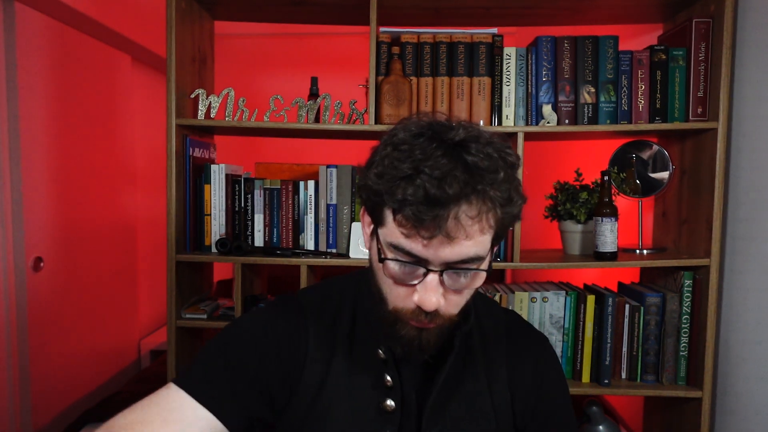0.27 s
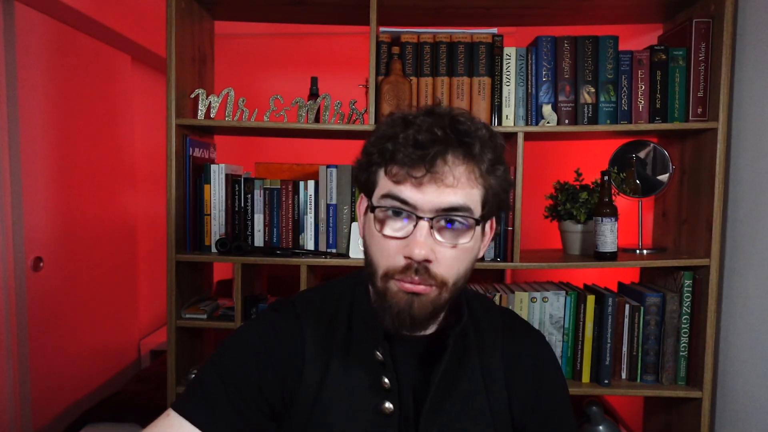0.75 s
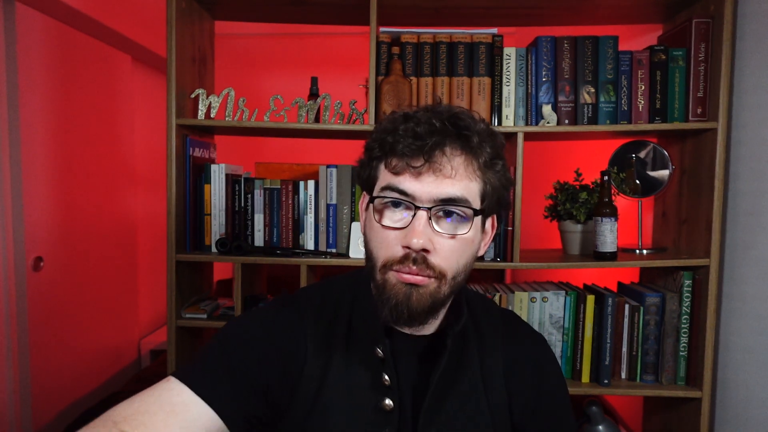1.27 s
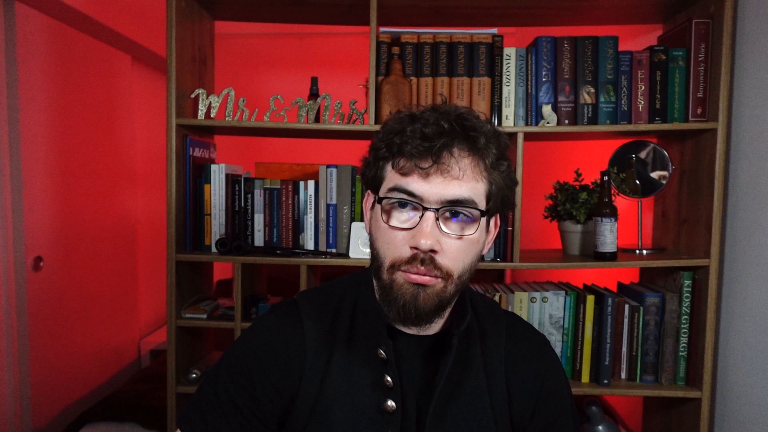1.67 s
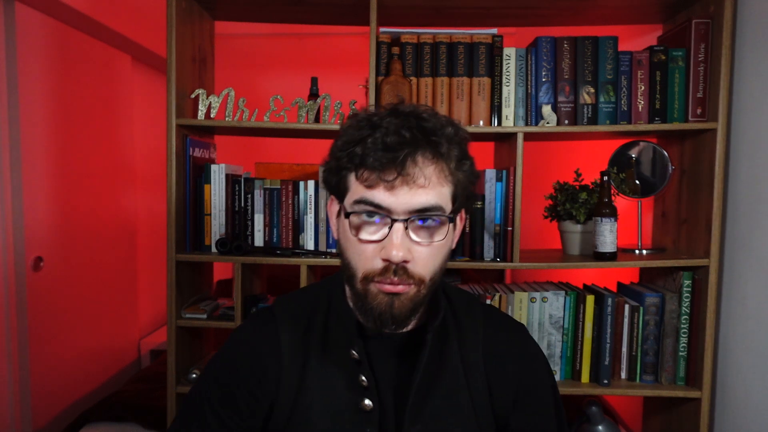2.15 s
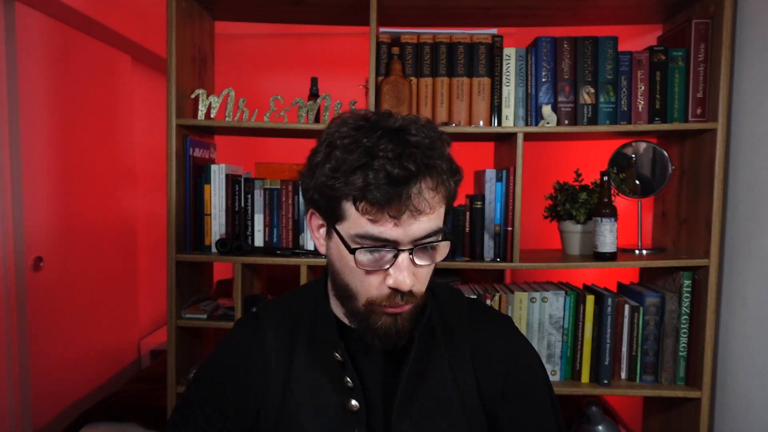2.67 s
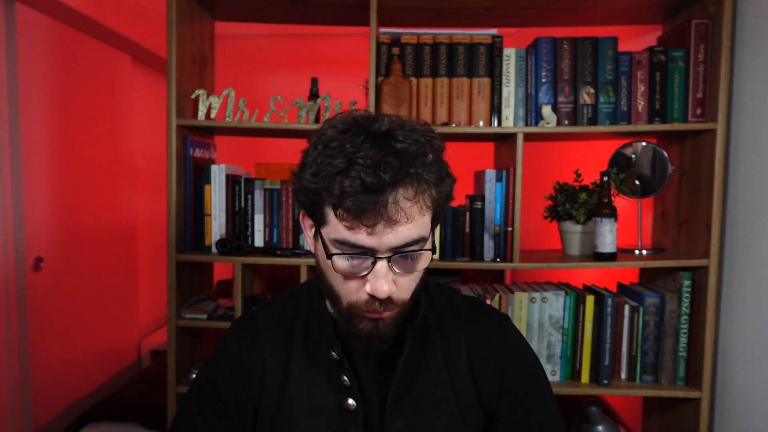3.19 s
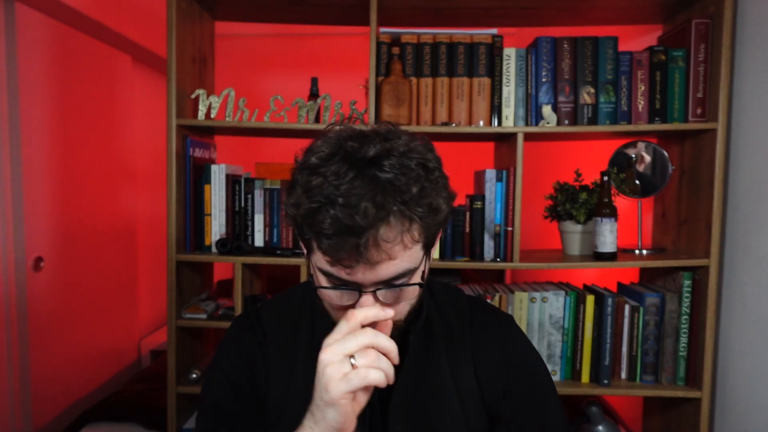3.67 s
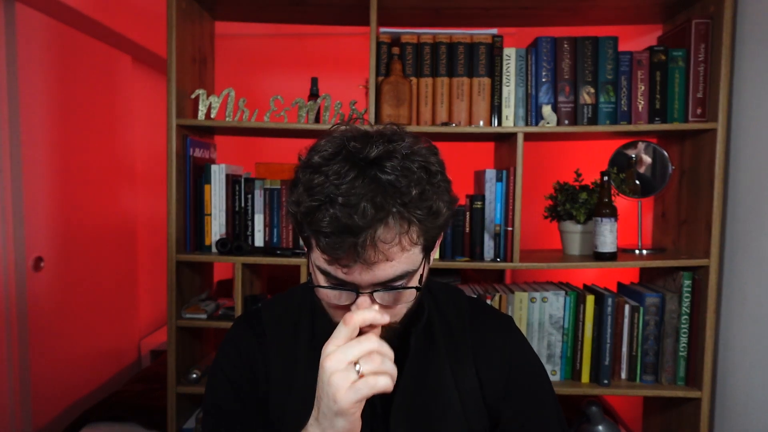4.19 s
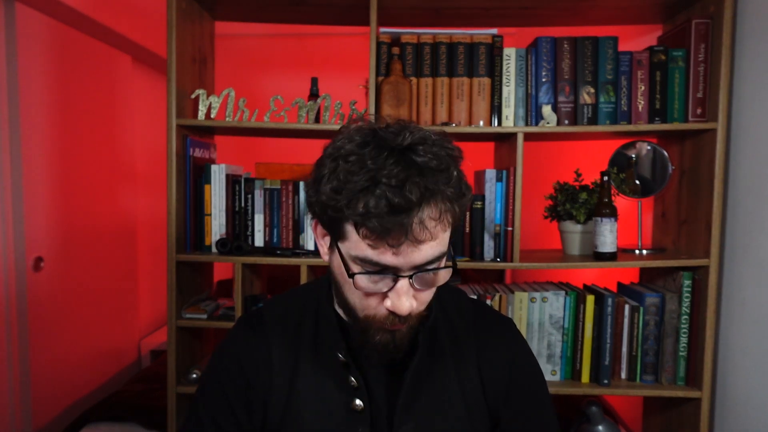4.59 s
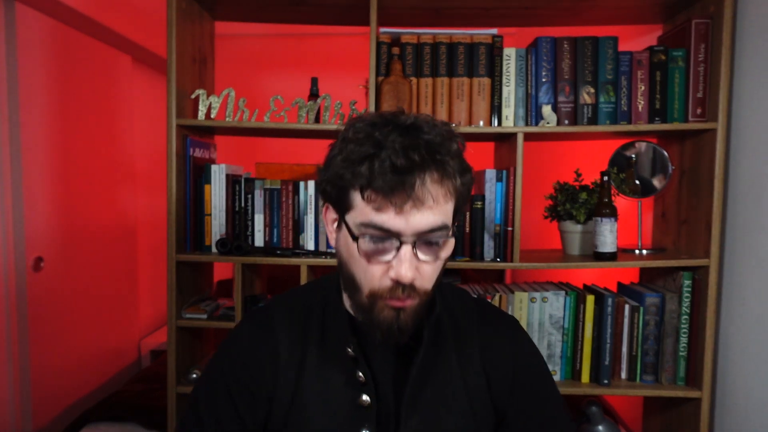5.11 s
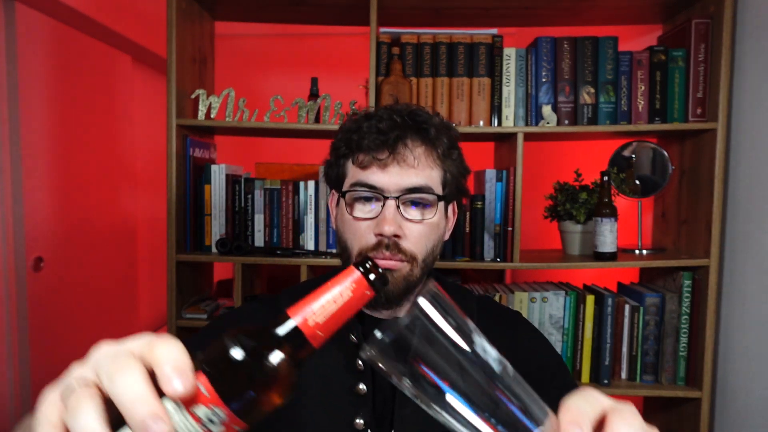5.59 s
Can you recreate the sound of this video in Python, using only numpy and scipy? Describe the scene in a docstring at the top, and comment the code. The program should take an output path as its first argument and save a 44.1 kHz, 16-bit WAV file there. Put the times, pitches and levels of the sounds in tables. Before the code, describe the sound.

Close stereo microphone in a small, fairly dry room. Hard objects scrape and knock on a wooden table, thinning out, then a steel opener ticks against a bottle. The cap cracks off with clattering snaps and a short sputtering hiss. A glass then rubs over the wood in three pushes, and tiny drops fall at the very end.

```python
"""Opening a beer bottle at a table

A small room with a wooden table, a stereo microphone close by. Noise drags and cracks, with ringing wood,
give the things shifted and knocked on it; a steel opener ticks and rings on the cap, which gives way in a
clatter of snaps, with ringing cap and bottle and gas made of fluttering noise. Rubbing noise and resonances
slide a glass over the wood in three pushes; three short rising tones are the first drops falling into it."""
import sys
import numpy as np
from scipy import signal
from scipy.fft import rfft, irfft, next_fast_len
from scipy.io import wavfile
from scipy.ndimage import map_coordinates

SR = 44100
rng = np.random.default_rng(int(sys.argv[2]) if len(sys.argv) > 2 else 0)


def pcm_store(signal):
    """Save signal as 16-bit PCM."""
    levels = np.round(np.clip(np.atleast_2d(signal), -1, 1) * 32767)
    wavfile.write(sys.argv[1], SR, levels.astype(np.int16).T)


N = 257984  # length in samples

# Quiet air at the microphone. Each row: frequency in Hz, relative level in dB per Hz.
AIR_COLOUR = [(15, -66.5), (25, -35), (86, -4), (140, 1.5), (260, 1), (331, -5), (582, -8), (848, -11.5),
              (1380, -12.5), (1710, -14.5), (5280, -19.5), (7910, -21.5), (8810, -21), (15500, -22)]
AIR_DB = -64
# Thin electronic whine. Each row: frequency in Hz, rms level in dB.
WHINE_TONES = [(6040, -92.5), (8107, -80.5), (10137, -85.5), (12086, -93)]
# Decay of the small room. Each row: frequency in Hz, t60 in seconds.
ROOM_DECAY = [(100, 0.26), (260, 0.33), (700, 0.33), (1840, 0.32), (4850, 0.32), (12800, 0.17)]
# Echoes from table top, shelves and nearest walls. Each row: delay in seconds, left and right in dB re direct.
NEAR_ECHOES = [(.0031, -15, -15), (.0079, -12, -14), (.0118, -14, -12), (.0183, -13, -14),
               (.0237, -15, -14)]
ONSET_DB = 31  # every swell rises from this far below its peak

# Something hard dragged over the table. Each row: start, rise and hold in seconds, gain in dB.
DRAG_SWELLS = [(-.01, 0.0077, 0.044, -23.5), (.32, 0.018, 0.0994, -53.5)]
DRAG_SAG_DB_PER_S, DRAG_RELEASE_DB_PER_S = 67, 240.5
# Ring of the dragged foot. Each row: frequency in Hz, width in Hz, relative level in dB.
DRAG_PEAKS = [(1180, 82, -19.5), (2815, 93, 0.5), (3220, 150, -2), (4750, 290, -2.5), (7590, 1100, -6),
              (12600, 950, -7.5)]
# Dull shuffling on the table. Each row: start, rise and hold in seconds, gain in dB.
SHUFFLE_SWELLS = [(-.01, 0.0066, .12, -28.5), (.33, 0.075, 0.047, -42.5), (.69, 0.075, .25, -53.5),
                  (1.73, .07, .12, -57), (4.66, 0.1, 0.053, -47.5)]
SHUFFLE_SAG_DB_PER_S, SHUFFLE_RELEASE_DB_PER_S = 48.5, 55.5

# Knocks on the table. Each row: start in seconds, thump, wood ring and hard click (before trims) in dB.
KNOCK_EVENTS = [(.003, -21, -23.5, -25.5), (.029, -29, -25, -26), (0.083, -22, -23.5, -28),
                (.191, -25.5, -31.5, -67), (.333, -33, -34, -39.5), (.429, -31.5, -30, -41.5),
                (0.4458, -20.5, -26, -15.5), (.555, -46, -55, -31.5), (0.5843, -28.5, -49, -26.5),
                (0.617, -44, -33, -62), (.789, -62, -50, -80), (.91, -54, -48.5, -80),
                (1.193, -29, -23.5, -45.5), (1.1976, -38, -30, -28.5), (1.2081, -35, -21, -22.5),
                (1.368, -32, -28.5, -65), (1.801, -70.5, -50, -94.5), (4.8, -48.5, -38, -72),
                (4.872, -46.5, -46, -80.5)]
# Soft thump of a knock, also the shuffling. Each row: frequency in Hz, relative level in dB per Hz.
THUMP_COLOUR = [(40, -30.5), (70, -7), (120, -3), (250, 2.5), (500, -7), (800, -15.5), (1400, -26.5),
                (2500, -22), (6000, -42.5)]
# Hard click of a knock, also the bright drag. Each row: frequency in Hz, relative level in dB per Hz.
CLICK_COLOUR = [(300, -24), (900, -3), (1200, 2), (1700, -8), (2400, -2.5), (3100, 1.5), (3650, -4),
                (4400, -1), (5300, -3), (6600, -8.5), (7700, -3.5), (9800, -5), (12000, -4.5), (15500, -9)]
# Modes of the table top. Each row: frequency in Hz, relative level in dB, t60 in seconds.
WOOD_MODES = [(82.8, -21.5, 0.66), (115.2, -6, 0.8), (117.5, -2.5, 0.42), (175.8, -0.5, 0.38),
              (186.2, -5.5, .35), (203.6, -6.5, 1), (206.9, -0.5, 0.54), (239, -11.5, 0.41),
              (285, 1.5, 0.41), (315, -15.5, 0.2), (384, -15, 0.091), (451, -8, 0.51), (479, -16, 0.17),
              (720, -15.5, 0.45), (826, -20.5, 0.5), (986, -18, 0.13), (2430, -28, 0.61), (2560, -22, .65),
              (2600, -24, 0.61)]
# Thick foot of the glass. Each row: frequency in Hz, relative level in dB, t60 in seconds.
GLASS_FOOT_MODES = [(1200, -3.5, 0.74), (1370, 0, 0.332), (2254, -7, 0.31), (3000, 5, .3), (3220, 0, 0.48),
                    (3220, -5, 0.25), (4050, 8, 0.106), (4410, -13, 0.13), (4870, 9.5, 0.14),
                    (7600, 9.5, 0.08), (8200, -3.5, 0.15)]
# ring of the table in dB per octave; it falls by WOOD_DEEPENS for each dB of ring over thump
WOOD_TILT_DB, WOOD_DEEPENS = 0, 0.65
CLACK_DB = -20  # the mid-range clack of a knock, over its thump

# Opener against cap and neck. Each row: start in seconds, tick (before a trim) and steel ring in dB,
# ring tilt in dB per octave.
CLINK_EVENTS = [(1.4374, -44, -56, 7), (1.5705, -42.5, -57, -15.5), (1.6177, -34.5, -36, 5.5),
                (1.6698, -27.5, -34, 16), (1.6822, -26, -16.5, 12.5), (2.0071, -55, -55, -20),
                (2.0857, -58.5, -60, -4), (2.383, -35, -39, -15), (2.468, -22.5, -25.5, -10),
                (2.4728, -20.5, -17, -5), (2.5396, -19, -13.5, 0.5), (2.558, -27.5, -28, -1),
                (2.566, -22, -26.5, -0.5), (2.622, -32.5, -33.5, -5.5), (2.63, -25.5, -33, -4),
                (2.6812, -34.5, -29.5, -9)]
# A small steel contact. Each row: frequency in Hz, relative level in dB per Hz.
TICK_COLOUR = [(500, -38), (1700, -16.5), (2400, -2), (3300, -3.5), (4300, 0), (5100, 6), (6100, -8),
               (8000, 1), (9700, -3.5), (11200, -13), (13500, -6.5), (15500, -8)]
# Modes of the steel opener. Each row: frequency in Hz, relative level in dB, t60 in seconds.
STEEL_MODES = [(4611, -11, .24), (4720, -13, .22), (4890, -7, .18), (4990, -4, .15), (5025, -1, .27),
               (5070, -3, .14), (5235, -10, .2), (8576, -4, .13), (8641, -6, .15), (9545, -7, .14),
               (9592, 0, .17), (9658, -6, .22), (9728, -5, .14), (9840, -9, .14), (10210, -15, .2),
               (13360, -20, .15), (14440, -17, .13), (15580, -20, .12)]
HOOKED_S = 2.3  # the opener hooks on
LOOSE_BODY_DB, HOOKED_BODY_DB = -32.5, -10  # the bottle's share over a tick, before and after

# The cap is caught, bends, lets go, chatters and is tapped once more.
# Each row: start in seconds, snap in dB, cap ring in dB.
SNAP_EVENTS = [(2.3825, -44.5, -42), (2.7204, -13.5, -31), (2.742, -20.5, -47.5), (2.757, -25.5, -45.5),
               (2.829, -33.5, -47.5), (2.8877, -11, -34), (2.891, -14, -40.5), (2.9114, -23, -33),
               (2.929, -18.5, -22), (2.96, -18.5, -31.5), (2.9819, -14.5, -34.5), (2.999, -19, -23.5),
               (3.015, -14.5, -29), (3.025, -17, -27.5), (3.053, -16.5, -29.5), (3.07, -23, -31),
               (3.3951, -34.5, -69)]
# Snap of the cap, also clacks and bottle body. Each row: frequency in Hz, relative level in dB per Hz.
SNAP_COLOUR = [(60, -31.5), (130, -14.5), (260, 1), (700, -0.5), (1100, -1.5), (1700, 2), (2500, 3.5),
               (3500, -4), (5000, -12), (8000, -26.5), (12000, -27.5), (15500, -25)]
# Clear modes of the bottle. Each row: frequency in Hz, relative level in dB, t60 in seconds.
BOTTLE_MODES = [(245, -3, .7), (278, -3, .6), (381, -4, .5), (427, -4, .85), (507, -5, .45), (805, -10, 1),
                (835, -6, .6), (867, 0, 1.1), (1205, -10, .4), (1556, -12, .85), (1652, -6, .4),
                (1846, -11, .6), (2330, -5, .6), (2380, -6, 1.1), (2423, -2, 1.15), (2455, -2, 1.2),
                (2495, -5, 1), (2553, -6, 1.15), (2632, -1, 1.1), (3058, -9, 1), (3435, -13, 1)]
# Modes of the cap. Each row: frequency in Hz, relative level in dB, t60 in seconds.
CAP_MODES = [(5179, -8, .25), (7277, 0, .3), (8807, -5, .2), (9475, -8, .25), (9792, -5, .22),
             (10292, 0, .2), (12904, -4, .17), (14850, -7, .17)]
# The bottle's crowd of weak modes after the snaps. Each row: frequency in Hz, relative level in dB per Hz.
GLOW_COLOUR = [(60, -31), (140, -5.5), (240, 9), (340, -2), (600, -6.5), (860, -3.5), (1050, -18.5),
               (1700, -7), (2100, -11), (2500, 4.5), (2900, -10.5), (3500, -22), (5000, -32),
               (12000, -41.5)]
# over a snap: the bottle's clear modes, their tilt in dB per octave, its crowd of weak ones
BOTTLE_DB, BOTTLE_TILT_DB, GLOW_DB = -15, .3, -21
GLOW_FADE_DB_PER_S = 54.5  # how fast the weak modes die
# Gas escapes in a short puff, then a rush. Each row: start, rise and hold in seconds, gain in dB.
GAS_SWELLS = [(2.718, .007, .03, -24.5), (2.88, 0.028, 0.18, -16.5)]
GAS_SAG_DB_PER_S, GAS_RELEASE_DB_PER_S = 37, 349.5  # as the pressure drops; once it is spent
# Escaping gas. Each row: frequency in Hz, relative level in dB per Hz.
GAS_COLOUR = [(47, -55.5), (80, -19), (162, -21.5), (252, -2), (621, -2.5), (678, -22), (827, 2),
              (986, -13), (2380, -5.5), (8180, -19), (9980, -22.5), (10900, -36), (15500, -24.5)]

# The glass is pushed over the table. Each row: start, rise and hold in seconds, speed in dB re full speed.
GLASS_PUSHES = [(3.47, 0.28, 0.37, -0.5), (4.12, 0.17, 0.083, -1), (4.55, 0.12, 0.04, -8)]
PUSH_SAG_DB_PER_S, COAST_DB_PER_S = 6, 113  # it slows during a push, and faster after it
# Wood under the sliding glass. Each row: frequency in Hz, relative level in dB per Hz.
RUMBLE_COLOUR = [(29, -47), (50, -45), (105, -16), (280, 1), (332, -9), (372, 1.5), (494, 0.5), (706, -7),
                 (1130, -41), (1500, -29), (1950, -40), (3300, -120)]
# Foot rubbing the wood. Each row: frequency in Hz, relative level in dB per Hz.
RUB_COLOUR = [(470, -18), (800, 8.5), (928, 0), (1120, -3), (1310, -3), (2440, -1.5), (3960, -13.5),
              (4370, -12), (4710, -12), (6190, -21), (9920, -22.5), (12200, -30.5), (15500, -20)]
# Faint singing of the glass. Each row: frequency in Hz, width in Hz, relative level in dB.
GLASS_PEAKS = [(4326, 192, 11.5), (4362, 107, 14), (5770, 74, -14), (9780, 47, -20), (9810, 61, -9)]
DEEP_DB, RUMBLE_DB, RUB_DB, RING_DB = -43, -35, -43.5, -49  # gains at full speed
RUB_POWER, RING_POWER = 0.47, 0.47  # level goes with speed to this power
GRIP_SPEED = 0.23  # share of full speed around which the deep rumble stops growing
GRIT_SPEED = 0.14  # well below this share of full speed, grit and ring fade out
# The glass judders as it starts to move. Each row: start, rise and hold in seconds, gain in dB.
JUDDER_SWELLS = [(3.59, 0.017, 0.017, -32), (3.675, .035, 0.019, -26.5)]
JUDDER_HZ, JUDDER_BEND = 292, 0.051  # slip rate at full speed, and the power of speed it follows
JUDDER_SAG_DB_PER_S, JUDDER_RELEASE_DB_PER_S = 66, 90

# First drops into the glass. Each row: start in seconds, starting frequency in Hz, gain in dB.
DROP_EVENTS = [(5.778, 3900, -73.5), (5.812, 1717, -65), (5.833, 3950, -56)]
TOP_HZ = 15750  # band limit of the recorder


def amp(db):
    """Decibels to gain."""
    return 10 ** (np.asarray(db) / 20)


def unit(x):
    """Scale to rms 1."""
    return x / np.sqrt(np.mean(x ** 2) + 1e-20)


def along(points, hz):
    """Interpolate (Hz, value) points on a log frequency axis."""
    f, value = np.transpose(points)
    return np.interp(np.log(hz + 1), np.log(f + 1), value)


def wobble(rate):
    """A smooth random curve, rate knots a second."""
    knots = rng.standard_normal(int(N * rate / SR) + 4)
    return map_coordinates(knots, [np.arange(N) * rate / SR])


def filtered(x, response):
    """Multiply the spectrum of x by a response of frequency."""
    n = x.shape[-1]
    size = next_fast_len(n + 8192)
    return irfft(rfft(x, size) * response(np.fft.rfftfreq(size, 1 / SR)), size)[..., :n]


def coloured(x, spectrum, size=2048):
    """Causal (minimum-phase) filter of unit energy with the given spectrum."""
    cepstrum = irfft(np.log(amp(along(spectrum, np.fft.rfftfreq(size, 1 / SR)))))
    # folding the cepstrum puts the energy as early as possible
    cepstrum[1:size // 2] *= 2
    cepstrum[size // 2 + 1:] = 0
    impulse = irfft(np.exp(rfft(cepstrum)))
    impulse = impulse / np.linalg.norm(impulse)
    return signal.fftconvolve(x, impulse[None], axes=1)[:, :x.shape[-1]]


def resonant(x, peaks):
    """Pass x through (Hz, width Hz, dB) resonances of alternating sign, at rms 1."""
    def response(f):
        total = 0
        for k, (centre, width, db) in enumerate(peaks):
            damping = 1j * f * width
            total = total + (-1) ** k * amp(db) * damping / (centre * centre - f * f + damping)
        return total
    return unit(filtered(x, response))


def spread(count, side_db):
    """White stereo noise: a part shared by both channels and an opposed part, side_db above it."""
    mid, side = rng.standard_normal((2, count))
    side = amp(side_db) * side
    return unit(np.array([mid + side, mid - side]))


def friction(grain_db, grain_rate, side_db):
    """Noise broken into tiny slips."""
    return unit(spread(N, side_db) * amp(grain_db * wobble(grain_rate)))


def add(track, s, sound):
    """Mix a sound in at time s."""
    start = max(round(s * SR), 0)
    track[:, start:start + sound.shape[1]] += sound[:, :N - start]


def swells(rows, sag_db_per_s, release_db_per_s):
    """Gain of (start, rise, hold, dB) swells: each rises, sags while it is held, then dies away."""
    t, gain = np.arange(N) / SR, np.zeros(N)
    for start, rise, hold, db in rows:
        age = t - start - rise
        fall_db = sag_db_per_s * np.clip(age, 0, hold) + release_db_per_s * np.maximum(age - hold, 0)
        gain += (t >= start) * amp(db + ONSET_DB * np.minimum(age / rise, 0) - fall_db)
    return gain


def nearby(x):
    """Close surfaces add weak copies, which comb the spectrum; the total energy is kept."""
    out = x.copy()
    for delay, left_db, right_db in NEAR_ECHOES:
        add(out, delay, x * amp([[left_db], [right_db]]))
    return out * np.sqrt(np.sum(x ** 2) / np.sum(out ** 2))


def contacts(times, levels_db, spectrum, crack_t60, room_db, side_db):
    """Short cracks, each with a room tail; the level is the crack's rms were its energy spread over 5 ms."""
    track, t = np.zeros((2, N)), np.arange(SR // 2) / SR
    for s, db in zip(times, levels_db):
        crack = rng.standard_normal(len(t)) * amp(-60 * t / crack_t60)
        # the tail decays at its own pace in each frequency band
        hz, frame, z = signal.stft(spread(len(t), side_db), SR, nperseg=256)
        fade = amp(-60 * frame / along(ROOM_DECAY, hz)[:, None])
        tail = signal.istft(z * fade, SR, nperseg=256)[1][:, :len(t)]
        tail = tail * (1 - np.exp(-t / 0.0018))
        level = amp(db) * np.sqrt(SR / 200 / len(t))
        add(track, s, level * (unit(crack) + amp(room_db) * unit(tail)))
    return coloured(track, spectrum)


def rings(times, levels_db, tilts_db, modes, attack, rough, rough_rate, side_db, tilt_top_hz=9600):
    """Every blow rings the same modes at new strengths; reflections smear each line."""
    track, t = np.zeros((2, N), complex), np.arange(SR) / SR
    hz, level, t60 = np.transpose(modes)
    envelope = amp(-60 * t / t60[:, None]) * (1 - np.exp(-t / attack))
    fading = (envelope * np.exp(2j * np.pi * hz[:, None] * t)).astype(np.complex64)
    for s, db, tilt_db in zip(times, levels_db, tilts_db):
        # where the blow lands decides whether low or high modes ring more
        octaves = np.log2(np.minimum(hz, tilt_top_hz) / hz[0])
        strength = amp(level + tilt_db * octaves + rng.normal(0, 1.1, len(hz)))
        strength = strength / np.linalg.norm(strength) * np.exp(2j * np.pi * rng.random(len(hz)))
        side = amp(side_db) * np.exp(2j * np.pi * rng.random(len(hz)))
        pair = np.array([strength * (1 + side), strength * (1 - side)], np.complex64)
        add(track, s, amp(db) * (pair @ fading))
    smear = 1 + rough * (wobble(rough_rate) + 1j * wobble(rough_rate))
    return (track * unit(np.abs(smear)) * np.exp(1j * np.angle(smear))).imag


def background():
    """Quiet room air and microphone hiss as shaped noise, and a thin electronic whine of steady tones."""
    t = np.arange(N) / SR
    whine = sum(amp(db) * np.sqrt(2) * np.sin(2 * np.pi * hz * t) for hz, db in WHINE_TONES)
    return amp(AIR_DB) * coloured(spread(N, side_db=-2), AIR_COLOUR) + whine


def scrape():
    """Tiny slips over the wood make a short bright drag that rings, and duller shuffling."""
    slips = friction(grain_db=-2.0, grain_rate=400, side_db=-7)
    bright = amp(-6.0) * coloured(slips, CLICK_COLOUR) + amp(0.5) * resonant(slips, DRAG_PEAKS)
    dull = coloured(friction(grain_db=1.5, grain_rate=120, side_db=-10), THUMP_COLOUR)
    drag = bright * swells(DRAG_SWELLS, DRAG_SAG_DB_PER_S, DRAG_RELEASE_DB_PER_S)
    shuffle = dull * swells(SHUFFLE_SWELLS, SHUFFLE_SAG_DB_PER_S, SHUFFLE_RELEASE_DB_PER_S)
    return nearby(drag + shuffle)


def knocks():
    """Each knock thumps, clacks and rings the table top; hard contacts click and ring the foot of the glass."""
    s, thump_db, ring_db, click_db = np.transpose(KNOCK_EVENTS)
    even = np.zeros(len(s))
    thump = contacts(s, thump_db, THUMP_COLOUR, crack_t60=0.04, room_db=0, side_db=-9)
    clack = contacts(s, thump_db + CLACK_DB, SNAP_COLOUR, crack_t60=.012, room_db=-5, side_db=1)
    click = contacts(s, click_db - 2, CLICK_COLOUR, crack_t60=0.021, room_db=-3.0, side_db=-5.5)
    foot = rings(s, click_db - 10.5, even, GLASS_FOOT_MODES, attack=0.00039,
                 rough=0.94, rough_rate=140, side_db=-6.5)
    wood_tilt_db = WOOD_TILT_DB - WOOD_DEEPENS * (ring_db - thump_db)
    top = rings(s, ring_db, wood_tilt_db, WOOD_MODES, attack=0.0013,
                rough=0.16, rough_rate=25, side_db=-24.5, tilt_top_hz=700)
    return nearby(thump + clack + click) + foot + top


def opener():
    """Steel ticks on the cap and rings; once it is hooked on, the bottle sounds much stronger with it."""
    s, tick_db, ring_db, tilt_db = np.transpose(CLINK_EVENTS)
    tick = contacts(s, tick_db - 0.5, TICK_COLOUR, crack_t60=.016, room_db=-0.5, side_db=-6.5)
    body_db = tick_db + np.where(s > HOOKED_S, HOOKED_BODY_DB, LOOSE_BODY_DB)
    body = contacts(s, body_db, SNAP_COLOUR, crack_t60=.02, room_db=4.5, side_db=-9.0)
    steel = rings(s, ring_db, tilt_db, STEEL_MODES, attack=0.00034, rough=0.4, rough_rate=110, side_db=-9.5)
    return nearby(tick + body) + steel


def cap():
    """The cap snaps and chatters, ringing itself and the bottle, while gas sputters out."""
    s, snap_db, cap_db = np.transpose(SNAP_EVENTS)
    even = np.zeros(len(s))
    snap = contacts(s, snap_db, SNAP_COLOUR, crack_t60=0.0098, room_db=0.0, side_db=-7.5)
    bottle = rings(s, snap_db + BOTTLE_DB, even + BOTTLE_TILT_DB, BOTTLE_MODES, attack=0.0018,
                   rough=.25, rough_rate=60, side_db=-14.5)
    crown = rings(s, cap_db, even, CAP_MODES, attack=.0005, rough=.15, rough_rate=70, side_db=-8)
    # too many weak modes to tell apart: their energy builds with each snap and leaks away
    t, energy = np.arange(N) / SR, np.zeros(N)
    for at, db in zip(s, snap_db):
        energy += (t > at) * amp(db - GLOW_FADE_DB_PER_S * np.abs(t - at)) ** 2
    glow = amp(GLOW_DB) * np.sqrt(energy) * coloured(spread(N, side_db=-9.0), GLOW_COLOUR)
    flow = swells(GAS_SWELLS, GAS_SAG_DB_PER_S, GAS_RELEASE_DB_PER_S)
    sputter = amp(3.3 * wobble(300) + 1.2 * wobble(45))
    gas = flow * sputter * coloured(spread(N, side_db=-9.5), GAS_COLOUR)
    return bottle + crown + nearby(snap + glow + gas)


def slide():
    """The foot of the glass rubs and judders on the table: the wood rumbles and the glass sings with speed."""
    speed = swells(GLASS_PUSHES, PUSH_SAG_DB_PER_S, COAST_DB_PER_S)  # share of full speed
    wood = coloured(friction(grain_db=0.5, grain_rate=180, side_db=-14), RUMBLE_COLOUR)
    deep = coloured(spread(N, side_db=-11.5), RUMBLE_COLOUR)
    deep = unit(filtered(deep, lambda hz: 1 / (1 + (hz / 240) ** 4)))
    rumble = amp(RUMBLE_DB) * speed * wood + amp(DEEP_DB) * np.tanh(speed / GRIP_SPEED) * deep
    grit = coloured(friction(grain_db=2.0, grain_rate=450, side_db=-7.5), RUB_COLOUR)
    rub = amp(RUB_DB) * speed ** RUB_POWER * grit
    ring = amp(RING_DB) * speed ** RING_POWER * resonant(spread(N, side_db=-7.5), GLASS_PEAKS)
    gritty = np.tanh(speed / GRIT_SPEED) ** 2
    slip_hz = JUDDER_HZ * speed ** JUDDER_BEND * (1 + 0.029 * wobble(70))
    judder_gain = swells(JUDDER_SWELLS, JUDDER_SAG_DB_PER_S, JUDDER_RELEASE_DB_PER_S)
    judder = judder_gain * np.sin(2 * np.pi * np.cumsum(slip_hz) / SR)
    return nearby(rumble + gritty * rub) + gritty * ring + judder


def drops():
    """The first drops of beer: small bubbles, decaying tones that rise in pitch."""
    track, t = np.zeros((2, N)), np.arange(SR // 10) / SR
    envelope = np.exp(-t / 0.014) * (1 - np.exp(-t / .001))
    for s, hz, db in DROP_EVENTS:
        bubble = np.sin(2 * np.pi * hz * (t + 0.67 * t * t)) * envelope
        add(track, s, amp(db) * bubble[None])
    return track


def scene():
    """Everything happens just in front of the microphone, the cap slightly to the right."""
    placed_cap = cap() * amp([[-.4], [.4]])  # left and right in dB
    return background() + scrape() + knocks() + opener() + placed_cap + slide() + drops()


def record(dry):
    """Two close capsules share the bass; the recorder cuts deep rumble, rounds off peaks and limits the band."""
    mid, side = (dry[0] + dry[1]) / 2, (dry[0] - dry[1]) / 2
    side_points = [(100, -7.5), (500, -3.0), (1000, -1.5)]  # Hz, dB
    side = filtered(side, lambda hz: amp(along(side_points, hz)))
    low_cut = signal.butter(4, 68, "highpass", fs=SR, output="sos")
    pair = signal.sosfilt(low_cut, [mid + side, mid - side])
    pair = pair / (1 + np.abs(pair / .8) ** 6) ** (1 / 6)  # peaks stay under 0.8
    return filtered(pair, lambda hz: 1 / (1 + (hz / TOP_HZ) ** 200))


dry = scene()
out = record(dry)
pcm_store(out)
```